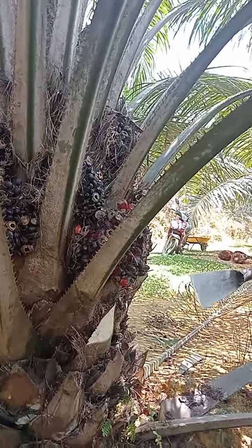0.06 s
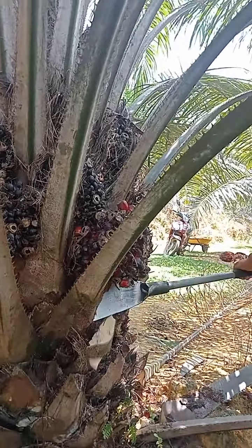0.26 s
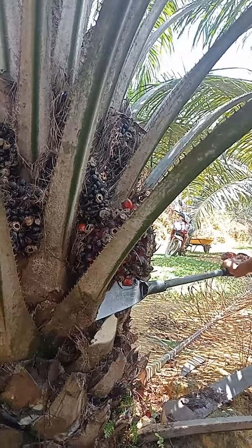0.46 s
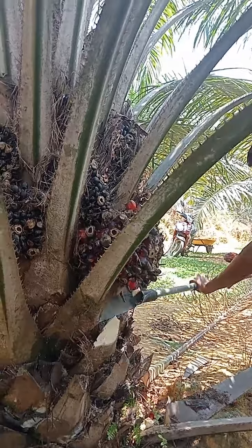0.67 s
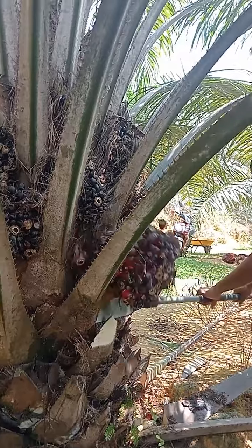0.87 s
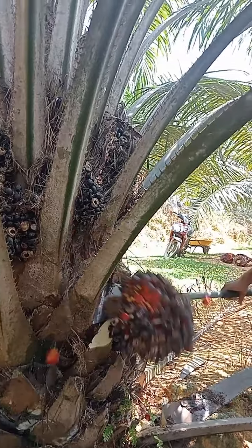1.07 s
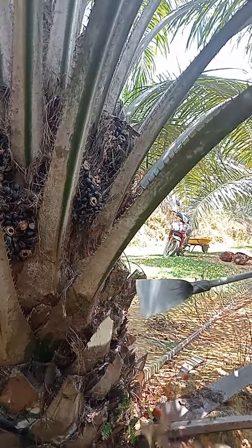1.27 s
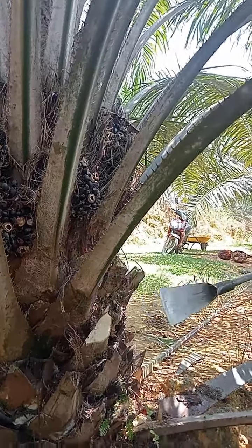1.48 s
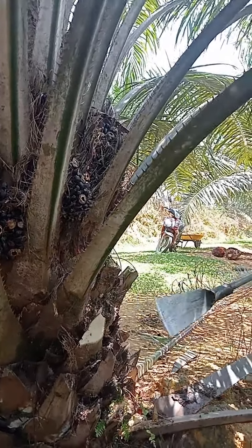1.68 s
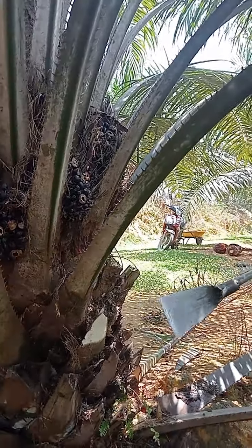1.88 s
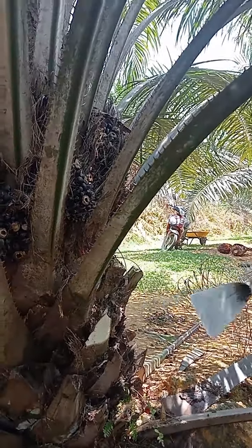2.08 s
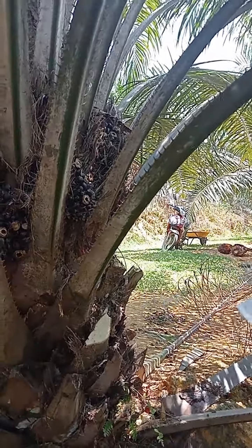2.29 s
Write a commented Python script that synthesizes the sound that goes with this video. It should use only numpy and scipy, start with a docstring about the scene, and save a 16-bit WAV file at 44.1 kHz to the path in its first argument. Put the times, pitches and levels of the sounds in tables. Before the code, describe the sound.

A chisel chops a palm stalk, and a heavy fruit bunch crashes into dry fronds.

```python
"""A long-handled chisel chops into the fibrous stalk of a palm fruit bunch, close to one microphone.
Fibres crunch under the edge and the pole rings; the blade is levered, and it clinks while the
slipping stalk creaks, squeaks and knocks. The bunch tears loose, thuds on the soil and tumbles
through dry fronds, which snap and rustle. The place is outdoors among palms: still air, a low
rumble and short reflections from trunks and ground."""
import sys
import numpy as np
from scipy import signal
from scipy.fft import rfft, irfft, next_fast_len
from scipy.io import wavfile
from scipy.ndimage import uniform_filter1d

SR = 44100
rng = np.random.default_rng(int(sys.argv[2]) if len(sys.argv) > 2 else 0)


def materialize(psi):
    """Save the field psi as 16-bit PCM at rate SR to the path in sys.argv[1].

    A 1-D psi becomes a single channel; in a 2-D psi each row is a channel.
    """
    bounded = np.clip(np.atleast_2d(psi).T, -1, 1)
    quanta = np.round(bounded * 32767).astype(np.int16)
    wavfile.write(sys.argv[1], SR, quanta)


N = 108045
TIME = np.arange(N) / SR


def from_db(db):
    """Decibels to gain."""
    return 10 ** (np.asarray(db) / 20)


def unit_rms(x):
    """Scale to an rms of 1."""
    return x / np.sqrt(np.mean(x ** 2) + 1e-20)


def colour(x, spectrum):
    """Causal filter with the given spectrum; white noise keeps its power."""
    size = next_fast_len(len(x) + 4096, real=True)
    size += size % 2
    hz, db = np.transpose(spectrum)
    bin_hz = np.fft.rfftfreq(size, 1 / SR)
    gain = unit_rms(from_db(np.interp(np.log(bin_hz + 1), np.log(hz), db)))
    cepstrum = irfft(np.log(gain))
    cepstrum[1:size // 2] *= 2   # folded for minimum phase
    cepstrum[size // 2 + 1:] = 0
    return irfft(rfft(x, size) * np.exp(rfft(cepstrum)))[:len(x)]


def resonate(x, hz, width_hz):
    """One resonance, with a gain of 1 at its peak."""
    radius = np.exp(-np.pi * width_hz / SR)
    feedback = [1, -2 * radius * np.cos(2 * np.pi * hz / SR), radius ** 2]
    return signal.lfilter(np.array([1, 0, -1]) * (1 - radius ** 2) / 2, feedback, x + 1e-18)


def ring(x, modes):
    """An object's modes sounded by x; rms 1."""
    return unit_rms(sum(from_db(db) * unit_rms(resonate(x, hz, np.log(1000) / np.pi / t60))
                        for hz, db, t60 in modes))


def grains(per_s, spread_db):
    """Random clicks of uneven size; rms 1."""
    sizes = from_db(spread_db * np.minimum(rng.exponential(1, N), 4)) * rng.choice([-1, 1], N)
    return unit_rms(sizes * (rng.random(N) < per_s / SR))


def burst(decay_s, size=4096):
    """A dying run of tiny fractures."""
    return rng.choice([-1, 1], size) * rng.uniform(0.62, 1, size) * np.exp(-TIME[:size] / decay_s)


def place(out, start_s, db, sound):
    """Mix in a short sound; its level is its energy spread over 5 ms."""
    start = int(start_s * SR)
    part = sound[:N - start] * np.sqrt(.005 * SR / np.sum(sound ** 2))
    out[start:start + len(part)] += from_db(db) * part


def envelope(curve):
    """Gain along a curve of seconds and dB, silent outside it."""
    seconds, db = np.transpose(curve)
    return from_db(np.interp(TIME, seconds, db, left=-120, right=-120))


# Spectra of the air and the rumble. Each row: frequency in Hz, relative level in dB.
AIR_SPECTRUM = [(60, -31), (200, -4.5), (500, -11.5), (1500, -12.5), (3000, -13), (4200, -7), (9000, -9),
                (12000, -21), (16000, -18)]
RUMBLE_SPECTRUM = [(25, -30), (55, -15), (100, 2), (200, -10), (500, -29), (2000, -65)]
# The rumble's fade. Each row: time in seconds, level in dB.
RUMBLE_LEVELS = [(0, -58), (1.0, -64.5), (2.45, -72)]


def outdoor_air(air_db=-53):
    """Still air hisses faintly around the microphone, over a slowly sinking rumble."""
    air = from_db(air_db) * colour(rng.standard_normal(N), AIR_SPECTRUM)
    rumble = envelope(RUMBLE_LEVELS) * colour(rng.standard_normal(N), RUMBLE_SPECTRUM)
    return air + rumble


def reflections(x, t60_s, gap_s=.002):
    """Trunks, fronds and ground scatter the sound back to the microphone."""
    t = TIME[:SR // 2]
    tail = rng.standard_normal(len(t)) * from_db(-60 * t / t60_s) * (t > gap_s)
    return signal.fftconvolve(x, tail / np.sqrt(np.sum(tail ** 2)))[:N]


# Swells of brushed leaves. Each row: peak time in seconds, level in dB, rise and fall in seconds.
LEAF_SWELLS = [(0.059, -49.5, 0.01, 0.034), (.33, -50, 0.052, 0.25), (.665, -40, 0.069, 0.078),
               (.86, -45, 0.063, 0.065), (1.02, -42.5, 0.17, 0.13), (1.25, -32.5, 0.016, 0.032),
               (1.30, -40.5, 0.033, 0.27), (1.345, -34, 0.045, 0.074), (1.415, -29, 0.042, 0.12),
               (1.55, -39.5, 0.18, 0.079), (1.709, -27.5, 0.015, 0.016), (1.751, -25, 0.03, 0.036),
               (1.871, -33, 0.022, 0.012), (1.969, -24, 0.0047, 0.017), (1.997, -23.5, 0.019, 0.028),
               (2.108, -36, 0.24, 0.073), (2.291, -36.5, 0.054, 0.031), (2.43, -43, 0.052, 0.016)]
# Spectrum of the leaves. Each row: frequency in Hz, relative level in dB.
LEAF_SPECTRUM = [(80, -26.5), (330, -17), (600, -3.5), (1300, -5), (2300, -2), (3600, 2), (6500, -1.5),
                 (9300, 2.5), (12000, -7.5), (15500, -10)]


def leaf_rustle(hiss_db=-3, clump_db=3, clump_s=0.0037):
    """Crushed leaves and litter crackle in clumps over the soft hiss of their sliding."""
    power = np.zeros(N)
    for peak_s, db, rise_s, fall_s in LEAF_SWELLS:
        swell = np.exp(-np.maximum((peak_s - TIME) / rise_s, (TIME - peak_s) / fall_s))
        power += (from_db(db) * swell) ** 2
    swings = rng.standard_normal(1500)
    clumps = from_db(clump_db * np.interp(TIME / clump_s, np.arange(len(swings)), swings))
    crackle = grains(per_s=8000, spread_db=4.0)
    hiss = from_db(hiss_db) * rng.standard_normal(N)
    return colour(np.sqrt(power) * unit_rms(clumps * (crackle + hiss)), LEAF_SPECTRUM)


# Dry fibres and leaflets. Each row: start in seconds, level in dB, decay in seconds, centre in Hz.
DRY_SNAPS = [(.602, -37, 0.0009, 5000), (.6235, -37, 0.00087, 4900), (.644, -29, 0.0058, 6900),
             (0.6936, -27, 0.0022, 4040), (0.7, -28, .003, 4120), (.713, -27, 0.0035, 3350),
             (0.785, -35.5, 0.012, 8600), (0.824, -32.5, 0.003, 7950), (.871, -35, 0.00067, 8500),
             (0.938, -36.5, 0.005, 8200), (0.969, -42, 0.0011, 9000), (1.176, -40, 0.0085, 4300),
             (1.2124, -33.5, 0.001, 4180), (1.2311, -29, 0.008, 9000), (1.2364, -17, 0.0018, 7950),
             (1.2679, -16.5, 0.0012, 8900), (1.285, -22, 0.0079, 9200), (1.2905, -24, 0.0037, 4060),
             (1.2956, -20, 0.0054, 9100), (1.4036, -18, 0.0094, 3620), (1.4064, -19.5, 0.0012, 8600),
             (1.4133, -22, 0.0013, 3650), (1.4825, -30, .0004, 9300), (1.542, -31, 0.0014, 6100),
             (1.557, -31, 0.0056, 5880), (1.5722, -27, 0.00061, 7800), (1.699, -26.5, 0.0045, 5440),
             (1.7167, -24, 0.00044, 9500), (1.7368, -20, 0.0019, 5930), (1.744, -28, 0.0011, 4600),
             (1.759, -24.5, 0.00045, 9300), (1.7627, -23, 0.00099, 9000), (1.78, -25, 0.0047, 5360),
             (1.8878, -25.5, 0.001, 10200), (1.953, -26, 0.00059, 5600), (1.9625, -24, 0.00095, 8900),
             (1.9821, -15.5, 0.00045, 9400), (1.986, -18, .0006, 10000), (2.021, -21, 0.0063, 3140),
             (2.0447, -25.5, 0.0018, 8200), (2.065, -26.5, 0.002, 2900), (2.104, -34, 0.0045, 6150),
             (2.1645, -17, 0.0002, 9200), (2.166, -26, 0.02, 9200), (2.2092, -32, 0.0022, 9300),
             (2.3431, -35, 0.0041, 4300)]
# Spectrum of a breaking fibre. Each row: frequency in Hz, relative level in dB.
SNAP_SPECTRUM = [(100, -13), (500, -7.5), (1500, -5), (2600, -2.5), (3800, 3.5), (6500, -1), (9000, 2),
                 (12000, -1), (16000, 1)]


def frond_snaps(crack_db=8.5, width_share=0.28, broadband_db=-10):
    """Each dry piece gives one sharp crack, then splinters, with a broad resonance of its own."""
    out = np.zeros(N)
    for start_s, db, decay_s, hz in DRY_SNAPS:
        crack = burst(decay_s)
        crack[0] = from_db(crack_db)
        snap = resonate(crack, hz, width_share * hz) + from_db(broadband_db) * crack
        place(out, start_s, db, colour(snap, SNAP_SPECTRUM))
    return out


# The bunch lands and rolls. Each row: start in seconds, level in dB, decay in seconds.
GROUND_HITS = [(1.235, -36.5, 0.0086), (1.2666, -33.5, 0.0091), (1.367, -42, 0.012), (1.404, -39, 0.014),
               (1.982, -38.5, 0.018), (2.16, -51, 0.0063)]
# Spectrum of the struck soil. Each row: frequency in Hz, relative level in dB.
SOIL_SPECTRUM = [(25, -23), (55, -5), (95, 1), (180, 6.5), (340, -5), (800, -35), (3000, -56)]


def bunch_thuds(push_db=24):
    """At each hit the heavy bunch gives the soft soil one push, then settles."""
    out = np.zeros(N)
    for start_s, db, decay_s in GROUND_HITS:
        push = burst(decay_s)
        push[0] = from_db(push_db)
        place(out, start_s, db, colour(push, SOIL_SPECTRUM))
    return out


# Modes of a hard, dry frond base. Each row: frequency in Hz, relative level in dB, T60 in seconds.
FROND_BASE_MODES = [(3800, 0, 0.016), (5050, -6, 0.015), (8400, 0, 0.018), (10000, -7, .016),
                    (12400, -10, .017)]


def frond_clack(start_s=1.2343, db=-14.5):
    """The bunch lands on a frond base and rings it with a short, rough contact."""
    out = np.zeros(N)
    place(out, start_s, db, ring(burst(decay_s=.0018), FROND_BASE_MODES))
    return out


# The stalk slips on the blade, then the bunch bumps over frond stems.
# Each row: start in seconds, level in dB, decay in seconds, centre in Hz.
WOOD_KNOCKS = [(.146, -43.5, 0.0018, 890), (.362, -45.5, 0.0034, 1820), (0.416, -48.5, 0.0038, 1900),
               (0.5247, -24.5, 0.0043, 1230), (0.5407, -24, 0.003, 1180), (0.5571, -30.5, 0.0049, 815),
               (0.6228, -33, 0.0024, 1700), (.639, -30.5, 0.0052, 950), (0.645, -35, 0.0021, 347),
               (.859, -37.5, 0.0088, 1860), (0.907, -43, 0.0025, 1660), (.938, -34, 0.0025, 760),
               (.968, -32.5, 0.0041, 610), (1.01, -33, 0.0024, 656), (1.171, -35, 0.0054, 520),
               (1.172, -40, 0.008, 2100), (1.19, -46, .003, 900), (1.2115, -34, 0.00047, 1810),
               (1.232, -28, 0.0052, 696), (1.322, -43, 0.0018, 800), (1.367, -38, 0.005, 960),
               (1.404, -23.5, 0.0047, 1630), (1.689, -32.5, .018, 1490), (1.723, -32.5, .012, 1430),
               (1.743, -29.5, 0.015, 1410), (2.157, -33.5, 0.0081, 1860), (2.395, -40, 0.0086, 690),
               (2.406, -42.5, 0.0015, 880)]
# Spectrum of the knocked wood. Each row: frequency in Hz, relative level in dB.
KNOCK_SPECTRUM = [(80, -21.5), (270, 0), (480, 4), (1300, -5), (2300, 0), (3000, -21), (6000, -16),
                  (15000, -47)]


def disperse(x, lag_s=0.003823, at_hz=500):
    """Bending waves in the pole: the lows arrive after the highs."""
    hz = np.fft.rfftfreq(len(x), 1 / SR)
    return irfft(rfft(x) * np.exp(-4j * np.pi * lag_s * np.sqrt(at_hz * hz)))


def woody_knocks(jolt_db=19, width_share=0.6, broadband_db=-12):
    """Each slip or bump is a jolt and a short judder, heard as a hollow, falling knock."""
    out = np.zeros(N)
    for start_s, db, decay_s, hz in WOOD_KNOCKS:
        slip = burst(decay_s)
        slip[0] = from_db(jolt_db)
        knock = resonate(slip, hz, width_share * hz) + from_db(broadband_db) * slip
        place(out, start_s, db, disperse(colour(knock, KNOCK_SPECTRUM)))
    return out


# Rubbing fibres. Each row: start in seconds, level in dB, length in seconds, pitch in Hz.
FIBRE_RUBS = [(.738, -35.5, 0.036, 597), (1.043, -35, 0.015, 1913), (1.067, -38, 0.015, 362),
              (1.126, -40, 0.034, 9250), (1.16, -34, 0.016, 481), (1.9215, -35, 0.0041, 3000)]


def fibre_squeaks(glide_share=0.096, wobble_share=0.06, flutter_share=0.66):
    """Stick and slip turns nearly regular: a short, rising tone that flutters with the uneven grip."""
    out = np.zeros(N)
    for start_s, db, length_s, hz in FIBRE_RUBS:
        wobble, grip = unit_rms(uniform_filter1d(rng.standard_normal((2, 4096)), size=60))
        progress = np.minimum(TIME[:len(wobble)] / length_s, 1)
        pitch_hz = hz * (1 + glide_share * (progress - .5) + wobble_share * wobble)
        loudness = (1 + flutter_share * grip) * np.sin(np.pi * progress)
        tone = loudness * np.sin(2 * np.pi * np.cumsum(pitch_hz) / SR)
        place(out, start_s, db, resonate(tone, hz, width_hz=420))
    return out


# Modes of the steel blade. Each row: frequency in Hz, relative level in dB, T60 in seconds.
STEEL_MODES = [(1900, -1, .028), (4250, -4, .018), (5400, -8, .022), (6800, -2, .024), (9100, -7, .02)]
# The blade shifts in the cut. Each row: start in seconds, level in dB.
BLADE_SHIFTS = [(.4825, -38), (.509, -40.5), (.677, -38), (.714, -37)]


def blade_clinks():
    """Brief contacts ring the blade."""
    out = np.zeros(N)
    for start_s, db in BLADE_SHIFTS:
        place(out, start_s, db, ring(burst(decay_s=.0018), STEEL_MODES))
    return out


# The stalk's creak as the bunch is levered off. Each row: time in seconds, level in dB.
CREAK_LEVELS = [(.39, -67), (.43, -42), (.47, -60.5), (.56, -43), (.61, -46), (.655, -44.5), (.71, -48),
                (.77, -60.5), (.81, -48.5), (.86, -51), (.925, -58), (.97, -50.5), (1.1, -42.5),
                (1.145, -49), (1.18, -47.5), (1.25, -45)]
# Spectrum of the hollow stalk. Each row: frequency in Hz, relative level in dB.
CREAK_SPECTRUM = [(80, -32), (220, -2), (330, 0.5), (480, 2), (600, 0.5), (800, -2.5), (1350, -10),
                  (2050, -2), (2800, -24), (6000, -21)]


def stalk_creak(tear_start_s=0.51, tick_db=-4.5, scrape_db=-4.5):
    """Wet fibres slip unevenly and sound the stalk; single ones tick and ring the blade as they tear."""
    strain = envelope(CREAK_LEVELS)
    stalk = colour(grains(per_s=900, spread_db=3.5) * strain, CREAK_SPECTRUM)
    tearing = grains(per_s=350, spread_db=6.5) * strain * (TIME > tear_start_s)
    ticks = from_db(tick_db) * colour(tearing, SNAP_SPECTRUM)
    scrape = from_db(scrape_db) * np.std(tearing) * ring(tearing, STEEL_MODES)
    return stalk + ticks + scrape


# The chop's crunch and its push on the woody stalk. Each row: time in seconds, relative level in dB.
CRUNCH_LEVELS = [(.198, -47), (.2105, -44), (.215, -16), (.224, -14), (.244, -21.5), (.254, -20),
                 (.268, -23.5), (.279, -31), (.29, -41)]
PUSH_LEVELS = [(.204, -51), (.214, -30.5), (.223, -15), (.242, -24.5), (.252, -16), (.263, -17.5),
               (.274, -28.5), (.286, -40)]
# Spectra of the crunch and the stalk's body. Each row: frequency in Hz, relative level in dB.
CRUNCH_SPECTRUM = [(300, -46), (1500, -19.5), (2900, -9), (4150, 4), (4900, -1.5), (6000, -7.5), (6850, 1),
                   (7700, -6.5), (9400, 2), (11000, -8), (15500, -9.5)]
BODY_SPECTRUM = [(50, -44), (130, -9), (220, -6.5), (380, -2.5), (760, -4.5), (1100, -3), (1600, -1),
                 (2250, 3), (2700, -17), (4500, -25)]


def chisel_chop(fibres_per_s=14000, crunch_db=-1, body_db=-2.5, pole_db=-7.5):
    """Close to the microphone, fibres break in a dense run under the edge, shaking stalk and pole."""
    breaks = grains(fibres_per_s, spread_db=1.5) * envelope(CRUNCH_LEVELS)
    crunch = from_db(crunch_db) * colour(breaks, CRUNCH_SPECTRUM)
    push = grains(fibres_per_s, spread_db=2.0) * envelope(PUSH_LEVELS)
    body = from_db(body_db) * unit_rms(colour(push, BODY_SPECTRUM))
    pole = from_db(pole_db) * pole_ring(push)
    return crunch + np.std(push) * (body + pole)


# Modes of the long pole. Each row: frequency in Hz, relative level in dB, T60 in seconds.
LONG_POLE_MODES = [(610, 0, 0.022), (1005, -7, 0.17), (1250, -6, .05), (1490, 1.5, 0.024),
                   (1552, -2, 0.073), (1850, -4.5, 0.03), (2102, 3.5, 0.022), (2170, -9, 0.023)]


def pole_ring(push):
    """The push at the blade rings the chisel's pole."""
    return ring(push, LONG_POLE_MODES)


def blade_lodging(start_s=.2545, db=-17, hz=486, swell_s=.007):
    """The blade lodges deep in the stalk and the pole gives a low, hollow note."""
    out = np.zeros(N)
    swell = (TIME / swell_s * np.exp(-TIME / swell_s)) ** 2
    place(out, start_s, db, swell * np.sin(2 * np.pi * hz * TIME))
    return out


def scene(early_db=-9.5, late_db=-23.5):
    """The close sources and the palms around them, at one microphone: both channels are the same."""
    near = chisel_chop() + blade_lodging() + blade_clinks()
    near += woody_knocks() + stalk_creak() + fibre_squeaks()
    near += frond_clack() + frond_snaps() + leaf_rustle() + bunch_thuds()
    early = from_db(early_db) * reflections(near, t60_s=0.072)
    late = from_db(late_db) * reflections(near, t60_s=0.32)
    return np.tile(near + early + late + outdoor_air(), (2, 1))


def record(dry, lift_db=6, cutoff_hz=15500):
    """The microphone port lifts the high treble; peaks are clipped and the top is cut."""
    bright = dry + (from_db(lift_db) - 1) * resonate(dry, hz=9370, width_hz=690)
    lowpass = signal.ellip(10, .2, 70, cutoff_hz, fs=SR, output="sos")
    return signal.sosfilt(lowpass, np.clip(bright, -.95, .95))


dry = scene()
out = record(dry)
materialize(out)
```